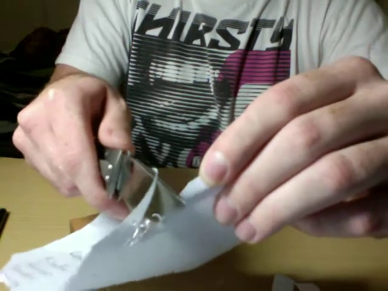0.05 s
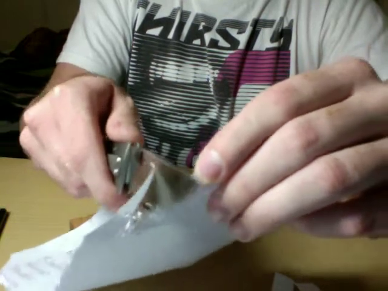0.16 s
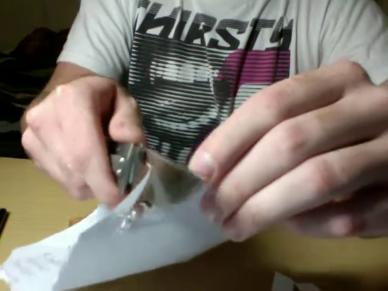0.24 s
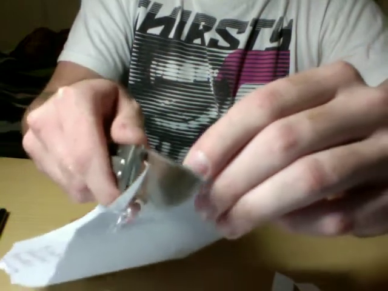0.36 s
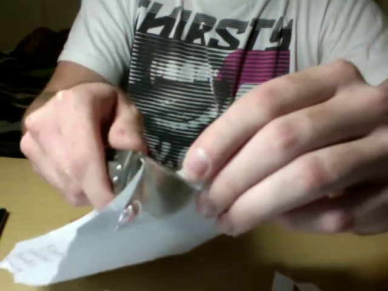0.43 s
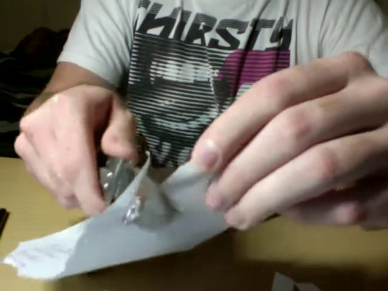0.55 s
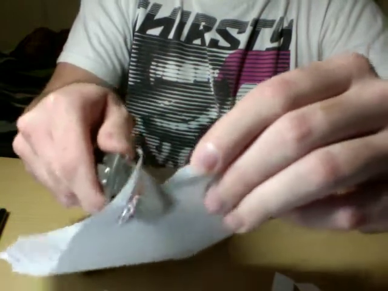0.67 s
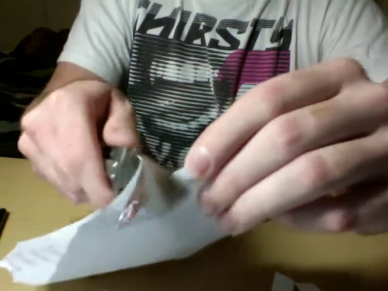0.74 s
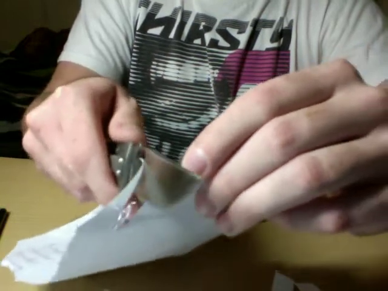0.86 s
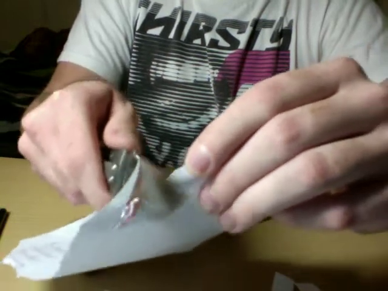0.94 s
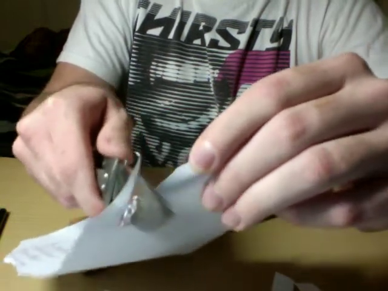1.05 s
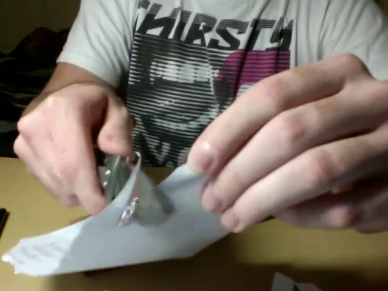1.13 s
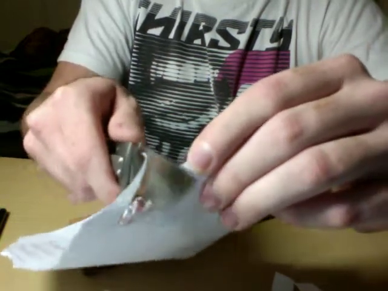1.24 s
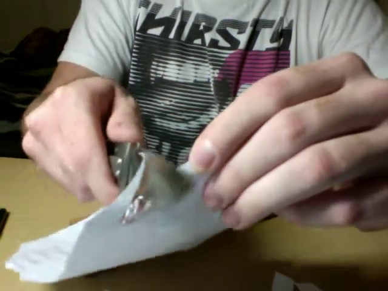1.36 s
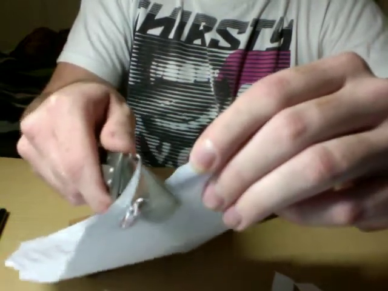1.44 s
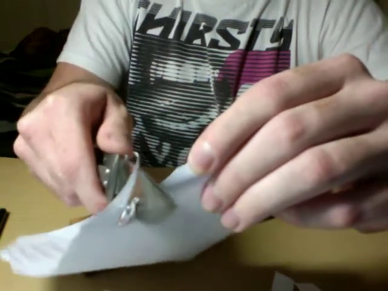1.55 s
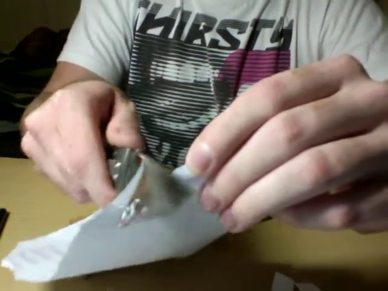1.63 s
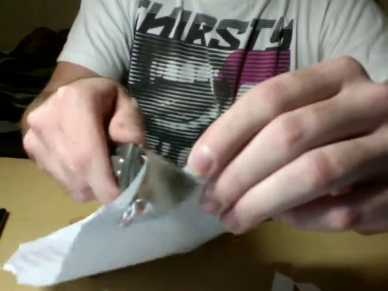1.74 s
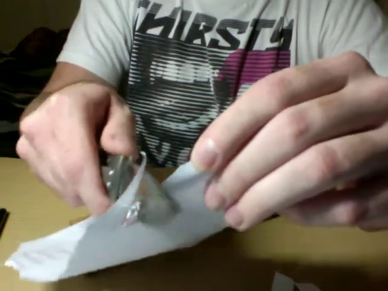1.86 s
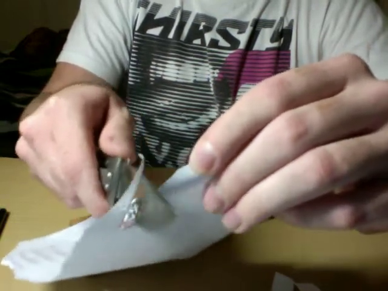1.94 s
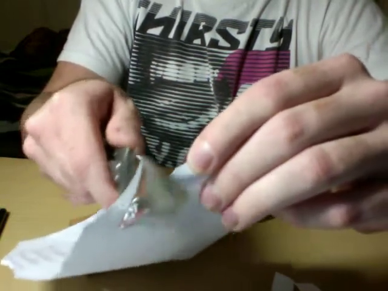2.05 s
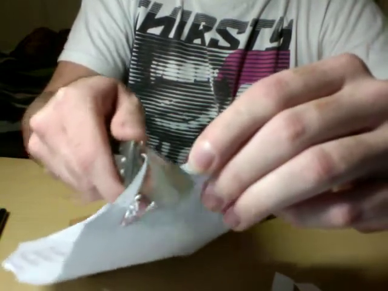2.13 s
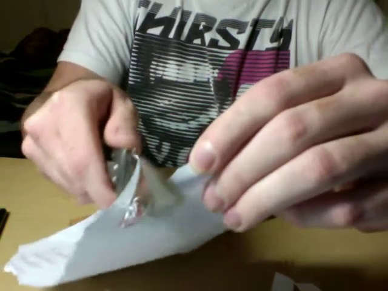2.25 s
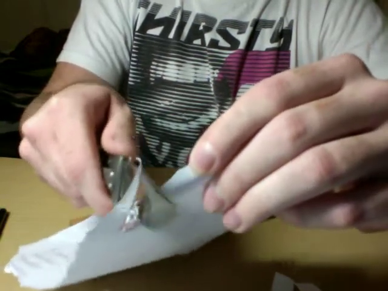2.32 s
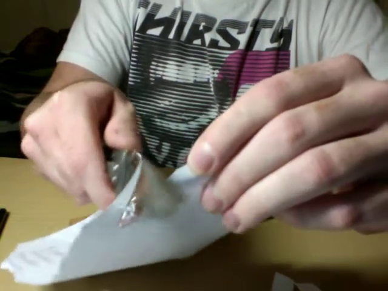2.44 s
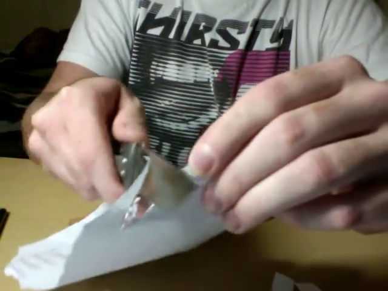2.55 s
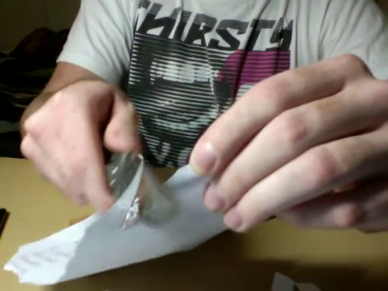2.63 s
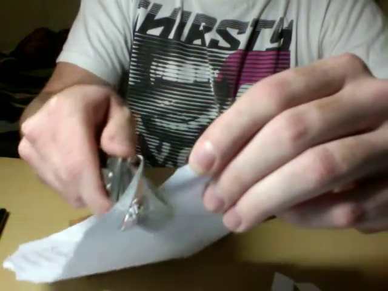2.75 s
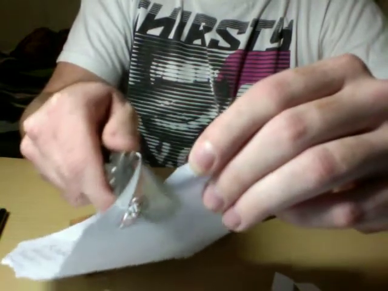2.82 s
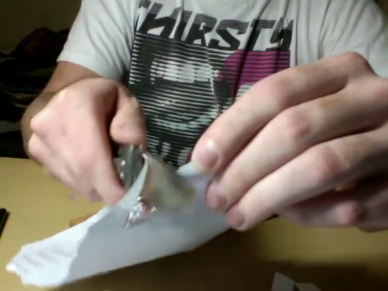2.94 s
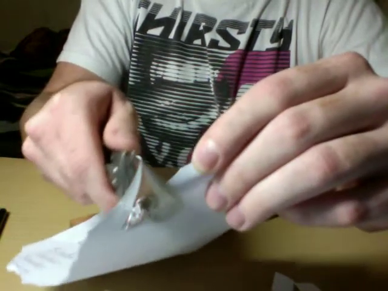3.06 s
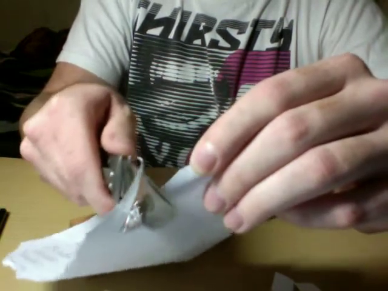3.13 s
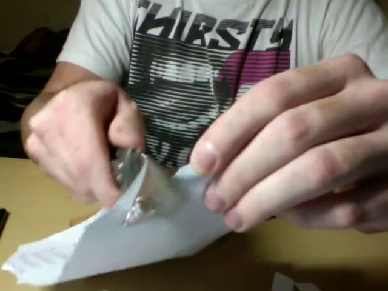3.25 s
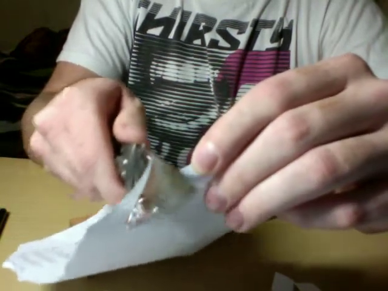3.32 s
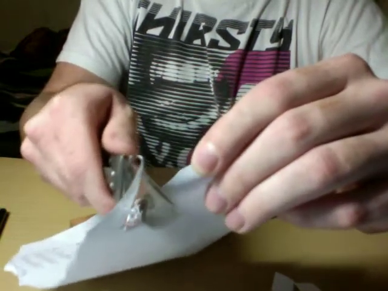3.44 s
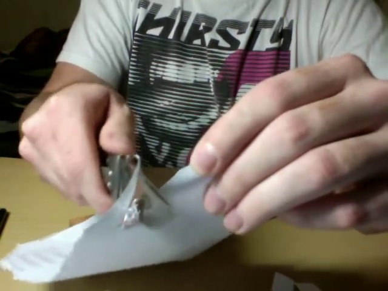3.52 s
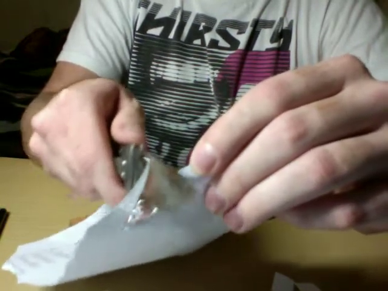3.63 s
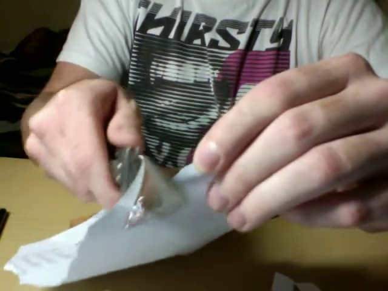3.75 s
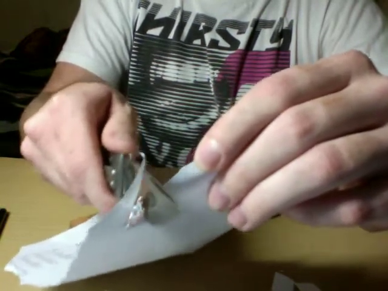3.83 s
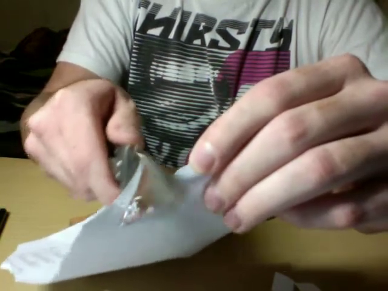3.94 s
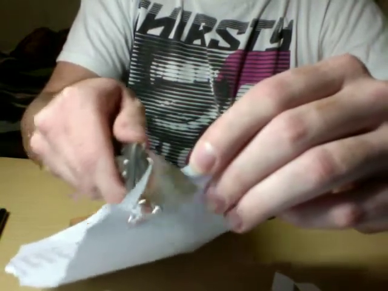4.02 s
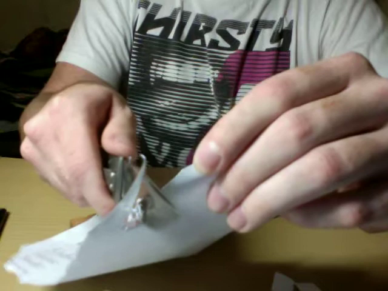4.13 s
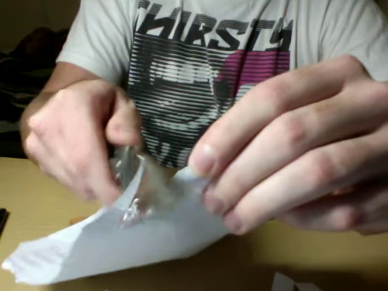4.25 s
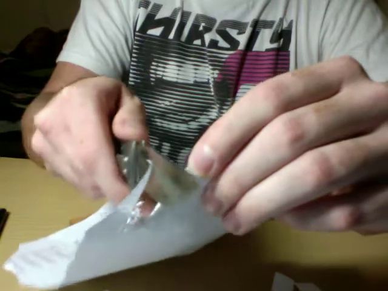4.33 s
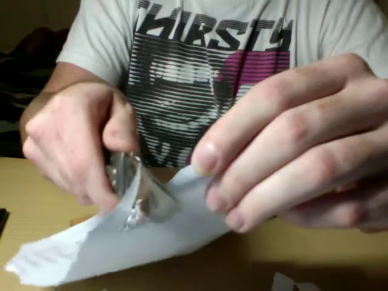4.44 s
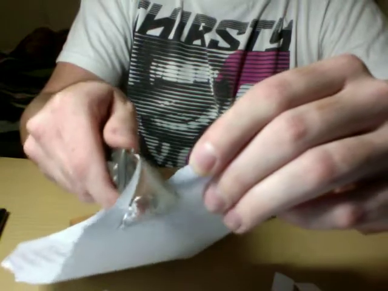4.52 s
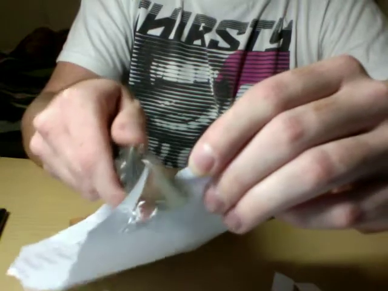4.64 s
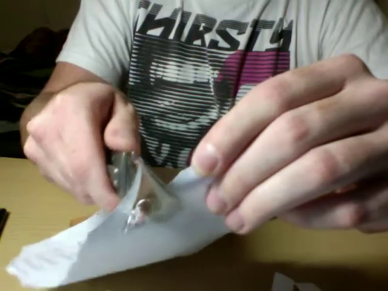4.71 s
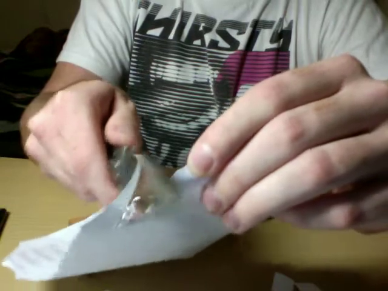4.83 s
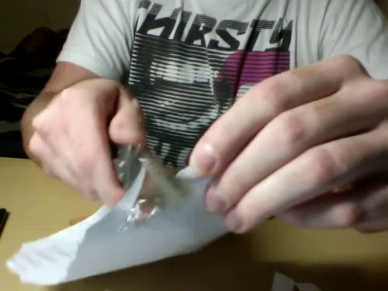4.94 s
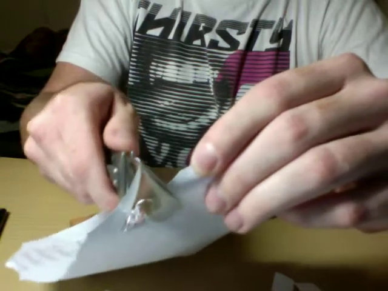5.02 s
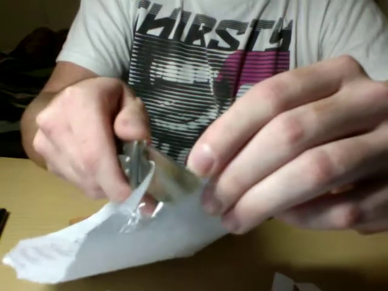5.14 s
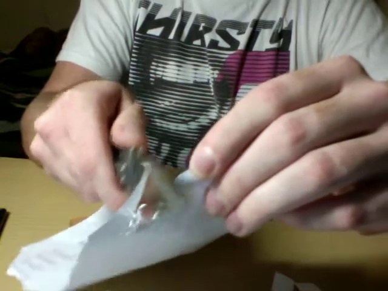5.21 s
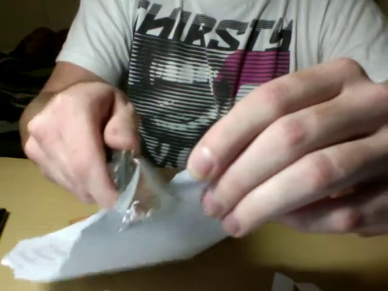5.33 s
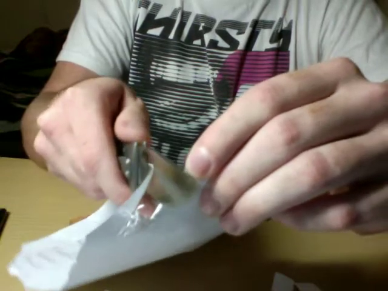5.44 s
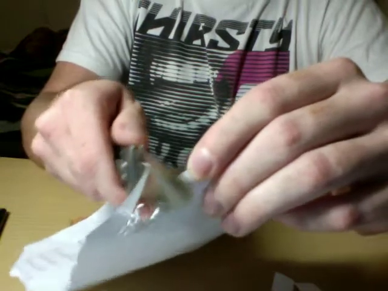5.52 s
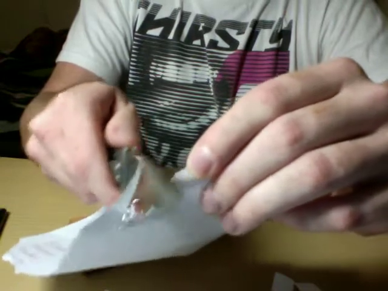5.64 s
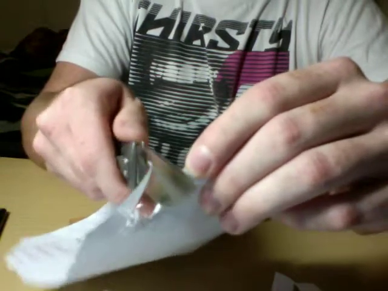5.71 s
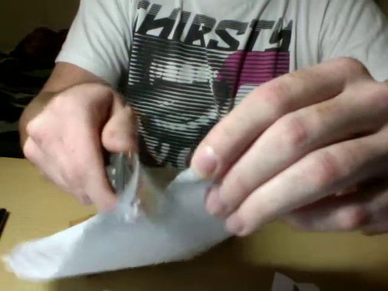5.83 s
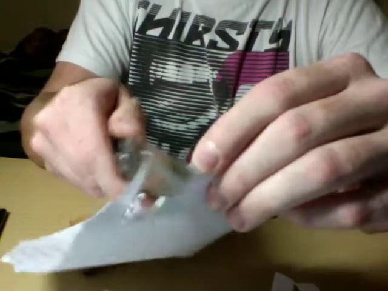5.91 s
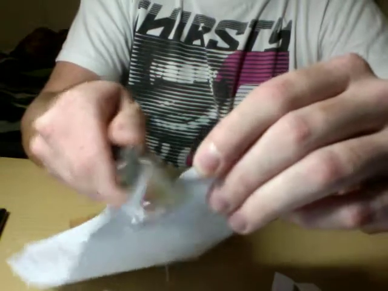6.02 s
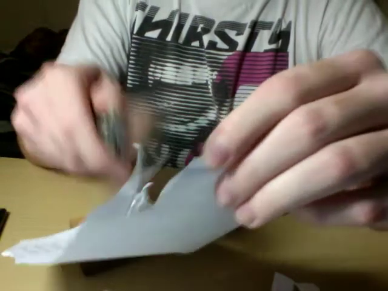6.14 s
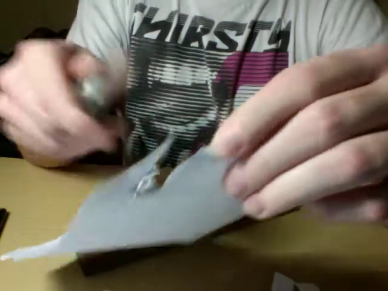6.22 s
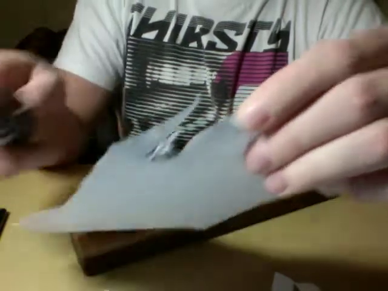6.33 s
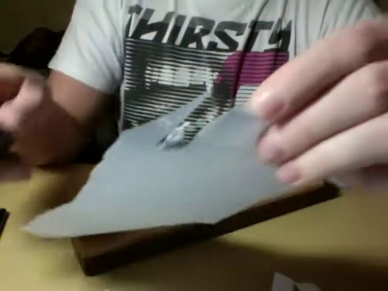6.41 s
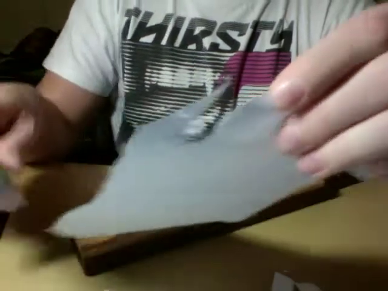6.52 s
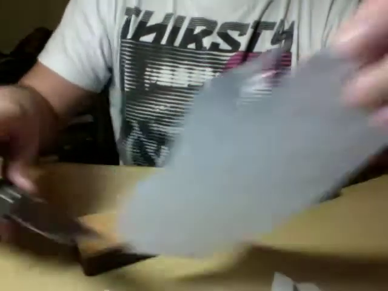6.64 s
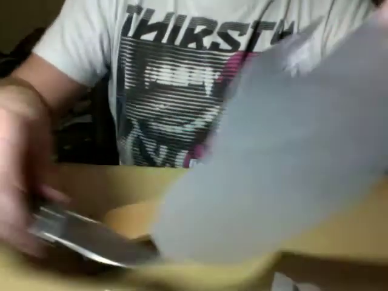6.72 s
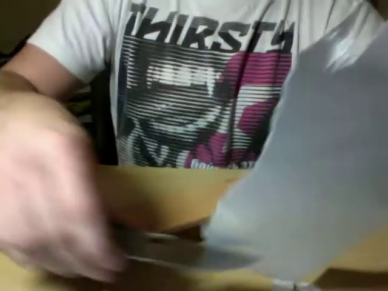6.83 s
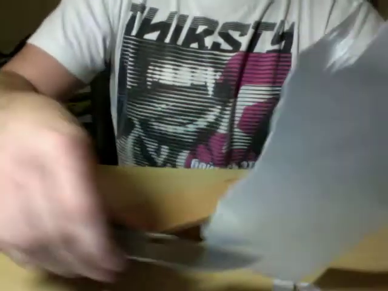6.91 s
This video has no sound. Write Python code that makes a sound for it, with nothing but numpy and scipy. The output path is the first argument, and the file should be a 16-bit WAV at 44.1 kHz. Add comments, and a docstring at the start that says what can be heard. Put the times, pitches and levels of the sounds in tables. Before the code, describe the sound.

Dry, crunchy bursts of snapping paper fibres, each little longer than a tenth of a second, repeat at a quickening pace. Some catch and stutter before breaking free. Between them a thin blade rub whispers in the slit, with tiny ticks and, later, hollow flexing thuds of the sheet. Close microphone, short indoor reflections, soft air hiss; the last second is almost silent.

```python
"""Knife sawing through paper

A hand-held sheet is sawn with a knife, close to the microphone in a small room. Each push is a dense shower
of fibre snaps ringing through the sheet; between pushes the blade rubs softly in the slit, as shaped noise.
As the strokes quicken, decaying tones give dull knocks of the flexing sheet; noise bursts give cracks and ticks.
Short reflections, air hiss and a faint hum lie behind."""
import sys
import numpy as np
from scipy import signal
from scipy.fft import rfft, irfft
from scipy.io import wavfile
from scipy.ndimage import uniform_filter1d

SR = 44100
rng = np.random.default_rng(int(sys.argv[2]) if len(sys.argv) > 2 else 0)


def file_out(sig):
    """Save sig as 16-bit WAV at sys.argv[1]."""
    # one column per channel
    cols = np.atleast_2d(sig).T
    # limit, then scale
    lim = np.clip(cols, -1, 1)
    pcm = np.round(lim * 32767).astype(np.int16)
    wavfile.write(sys.argv[1], SR, pcm)


N = 307363  # length in samples, about 7 s

# Pushes of the blade. Each row: start in seconds, bite-in time in seconds, length in seconds,
# level in dB before the band trims, swell over the push in dB, bass and treble in dB relative
# to the level before their trims, loss of treble over the push in dB.
PUSHES = [(0.408, 0.026, 0.14, -31, -4, -9.5, -21.5, -5.5),
          (0.867, 0.035, 0.13, -31.5, 0.5, -9.5, -19, -3.5), (1.299, 0.047, 0.17, -32, -10, -5.5, -21, 0),
          (1.743, 0.066, 0.11, -33.5, -1.5, -7.5, -16, 9), (2.152, 0.032, 0.145, -32.5, -1, -2, -18, 0),
          (2.555, 0.037, 0.12, -31, -6.5, -4.5, -15.5, 8), (2.976, 0.013, 0.093, -30.5, -3, -10, -20, 2),
          (3.339, 0.063, 0.12, -31, -5, -7.5, -19, 11), (3.69, 0.043, 0.1, -33.5, 5.5, -8.5, -16, 5),
          (4.021, 0.032, 0.11, -37.5, -4.5, -5.5, -15, 11), (4.34, 0.012, 0.084, -31, 6.5, -8, -13.5, 8),
          (4.627, 0.028, 0.09, -29, -1.5, -6.5, -15.5, 9), (4.915, 0.022, 0.094, -32, -11.5, -7, -15, 10.5),
          (5.18, 0.025, 0.084, -30, -3.5, -3.5, -13, 5), (5.444, 0.037, 0.088, -30, 2, 0.5, -10.5, -10),
          (5.702, 0.018, 0.066, -28, 3.5, -5, -13.5, 6), (5.949, 0.015, 0.043, -29, 2, -2.5, -10, 0.5)]
# The edge snags in mid-push, then breaks free. Each row: moment it breaks free in seconds,
# time stuck in seconds, drop in level in dB (negative is a rise).
SNAGS = [(0.43, 0.012, 9), (0.485, 0.051, 10.5), (0.958, 0.037, 13.5), (1.812, 0.018, 16.5),
         (2.257, 0.039, 1), (2.643, 0.035, 19), (3.459, 0.033, 11), (3.728, 0.018, 2.5), (4.105, 0.009, 10),
         (4.687, 0.01, 21), (4.997, 0.012, -3), (5.515, 0.022, 10), (5.544, 0.016, 22), (5.767, 0.0097, 11)]
# Boom of the loose flap beside the slit. Each row: time in seconds, boost of the low bass in dB.
FLAP_BOOST = [(0.4, 4), (1.8, 4.5), (2.65, -9), (3.1, 9), (3.8, 12.5), (4.2, 13), (6.0, 3.5)]
# Colour of the cut sheet. Each row: frequency in Hz, relative density in dB per Hz.
SHEET_COLOUR = [(90, -43.5), (200, -18), (330, -23), (600, -23.5), (1500, -18.5), (3000, -17),
                (5000, -19.5), (6500, -17), (8000, -25), (12000, -28), (15400, -32)]
# Resonances of the sheet. Each row: centre in Hz, width in Hz, lift in dB.
SHEET_MODES = [(405, 118, 22.1), (491.7, 63, 12.8), (633, 160, 17.5), (762.4, 205, 18.1),
               (904.4, 138, 13.5), (1113, 192, 11.4), (1312, 286, 16.8), (1588, 68, 10.8),
               (1748, 154, 12.6), (2038, 130, 8.55), (2278, 432, 13.6), (2526, 276, 4.8), (2866, 203, 9.2),
               (3112, 290, 6.8), (3372, 464, 9.5), (3805, 1020, 8), (3900, 180, 1.8), (4380, 260, 8.8),
               (4850, 370, 8.7), (5417, 73, 9.3), (5720, 1400, 3.84), (7300, 49, 1.8), (7220, 110, 4.2),
               (9130, 2100, 3.4)]
# The blade drawn back through the slit, and last the sheet lifted away. Each row: start in seconds,
# length in seconds, level in dB and treble in dB relative to it (both before trims), ring of the edge in Hz.
RUBS = [(0.053, 0.036, -36.5, -12, 4150), (0.093, 0.072, -52, -4.5, 7800), (0.174, 0.15, -54.5, -3.5, 3300),
        (0.651, 0.05, -57, -7, 3460), (0.7, 0.082, -54, -5, 3300), (1.092, 0.075, -58, -11, 5570),
        (1.165, 0.076, -60, -25, 2840), (1.513, 0.04, -48.5, -10, 3200), (1.575, 0.08, -52, -19, 3430),
        (1.934, 0.12, -57, -11, 2260), (2.369, 0.043, -52, -12, 4440), (2.414, 0.049, -59, -3.5, 5340),
        (2.756, 0.11, -58, -10.5, 2250), (2.947, 0.012, -33, -20, 2370), (3.165, 0.03, -48, -4, 7800),
        (3.187, 0.079, -62, -5, 9500), (3.521, 0.105, -62, -5.5, 2240), (3.868, 0.098, -61, -1, 9400),
        (4.191, 0.1, -59, -1.5, 9500), (4.49, 0.096, -55.5, -8, 5400), (4.782, 0.086, -54.5, -2.5, 6160),
        (5.063, 0.082, -54.5, -5, 10300), (5.327, 0.08, -54, -7.5, 3940), (5.594, 0.081, -56.5, -7.5, 4150),
        (5.862, 0.045, -55.5, -1, 5100), (6.46, 0.16, -82, -2, 14500), (6.653, 0.24, -76, -10, 13000)]
# Colour of paper on the flat of the blade. Each row: frequency in Hz, relative density in dB per Hz.
RUB_COLOUR = [(300, 14), (1000, -4.5), (2000, -3), (3000, -0.5), (4500, -3.5), (6500, -7.5), (8000, -15.5),
              (12000, -20), (15400, -26.5)]
# Resonances of the rubbed paper. Each row: centre in Hz, width in Hz, full lift in dB.
RUB_MODES = [(3340, 400, 7), (4020, 300, 6), (4660, 130, 5), (5420, 450, 10), (6250, 300, 3),
             (6950, 250, 6), (9500, 600, 13), (10500, 700, 6), (13000, 600, 7)]
# The sheet flexes as the blade turns round or breaks free. Each row: start in seconds,
# swing level in dB, pitch in Hz, scuff in dB relative to the swing.
KNOCKS = [(0.586, -44, 308, -34), (1.162, -50, 407, -3), (1.176, -47.5, 366, -6), (2.771, -48, 360, -18),
          (2.848, -36.5, 403, -10), (3.268, -36, 398, -7.5), (3.624, -33.5, 406, -25),
          (3.972, -33, 413, -12), (4.105, -42, 206, 13), (4.297, -32, 414, -15.5), (4.333, -33.5, 434, -23),
          (4.577, -35, 450, -2.5), (4.86, -28.5, 451, -13), (4.996, -40, 456, 10), (5.130, -29, 460, -24),
          (5.449, -34.5, 554, -15), (5.541, -44.5, 430, 20), (5.545, -37, 177, -14),
          (5.653, -27.5, 452, -19), (5.769, -25.5, 417, -24), (5.771, -41, 183, -10),
          (5.912, -31.5, 446, -4.5), (5.953, -23, 630, -16), (6.227, -52, 340, -24),
          (6.249, -38, 316, -10.5), (6.261, -44, 186, -11)]
# The sheet cracks as the edge catches or breaks free. Each row: start in seconds,
# level in dB as if packed into 5 ms, crumple time constant in seconds.
CRACKS = [(0.4856, -48, 0.0092), (.9595, -30, 0.018), (1.8157, -29, 0.0059), (2.6431, -28.5, 0.0019),
          (3.0115, -25, 0.0024), (4.107, -21.5, 0.0034), (4.6975, -32.5, 0.0039), (4.998, -25, 0.0009),
          (5.5459, -24.5, 0.0027), (5.768, -36, 0.0055), (6.012, -32.5, 0.004), (6.028, -31, 0.0015)]
# The cut edge flicks against the steel. Each row: start in seconds,
# level in dB as if packed into 5 ms (before the bass is cut), ring in Hz.
TICKS = [(0.237, -40, 3060), (0.412, -39, 3050), (0.614, -45.5, 5160), (1.598, -44.5, 3800),
         (1.725, -44, 4300), (1.742, -31, 4480), (2.383, -56, 5400), (2.437, -50, 5480), (2.949, -47, 2420),
         (3.18, -41.5, 3200), (5.776, -41, 10800), (5.877, -39.5, 3680), (5.885, -42, 5200),
         (6.122, -44, 13200), (6.124, -42.5, 3920), (6.468, -61, 9500), (6.579, -63, 13500),
         (6.687, -61, 7050), (6.713, -52, 5000), (6.757, -59, 12400)]
# Room air and microphone hiss. Each row: frequency in Hz, relative density in dB per Hz.
AIR_COLOUR = [(60, -7), (100, -15.5), (150, -1.5), (220, -2.5), (400, -5.5), (700, -4.5), (1500, -6),
              (3500, -10.5), (4500, -17), (5200, -18.5), (7200, -24.5), (8200, -28.5), (15500, -48)]
# Faint hum in the room. Each row: frequency in Hz, average level in dB rms.
HUM = [(141, -75), (166, -81), (339, -77), (404, -73)]

BITE_IN_DB = 22  # climb in level while the edge sinks in
RELEASE_DB_PER_S = 913  # fall once the hand stops
BREAK_FREE_S = 0.0084
RUB_RISE_S, RUB_FALL_S = 0.016, 0.032
ROOM_T60_S, WALL_CUT_HZ, ROOM_DB = 0.22, 2100, -14.5  # T60 below the cut
AIR_DB = -59.5  # rms
CUTOFF_HZ = 15750


def cutting(bass_db=-3.9, middle_db=-9.5, rasp_db=-3.0, keen_db=-7.0, treble_db=1.6, clump_db=3.2,
            middle_swell_db=8.0, snag_thinning=0.18, snag_hiss=0.41, keen_follows=0.74,
            usual_treble_db=-9.5, wander_db=3.0, bass_swell_db=-4.5):
    """Fibres part in clumps and ring the sheet; five bands shift in balance along a push and at snags."""
    gain, along, bass, treble = pushes()
    held = snagging()
    fibres = snaps(per_s=9000, spread_db=2.5) * from_db(clump_db * drift(123))
    ringing = through(fibres, response(SHEET_COLOUR, SHEET_MODES))
    sheet = bending(ringing, share=.8)
    sheet = evened(sheet, over_s=0.011)  # the hand keeps an even pressure

    flap = band(sheet, 380, "low")
    low = band(sheet, 870, "low")
    lower_half = band(sheet, 2014, "low")
    upper = band(sheet, 4880, "high")
    high = band(sheet, 7000, "high")

    flap_db = np.interp(np.arange(N) / SR, *np.transpose(FLAP_BOOST))
    booming = low + (from_db(flap_db) - 1) * flap
    body_db = bass + bass_db + bass_swell_db * along - snag_thinning * held
    body = from_db(body_db) * rms_one(booming)
    crunch_db = middle_db + middle_swell_db * along - snag_thinning * held
    crunch = from_db(crunch_db) * rms_one(lower_half - low)
    rasp = from_db(rasp_db) * rms_one(sheet - lower_half - upper)
    # the keen top of the rasp follows the treble and wanders with the angle of the edge
    keen_level_db = keen_db + keen_follows * (treble - usual_treble_db) + wander_db * drift(33)
    keen = from_db(keen_level_db) * rms_one(upper - high)
    hiss = from_db(treble + treble_db + snag_hiss * held) * rms_one(high)
    return gain * from_db(-held) * (body + crunch + rasp + keen + hiss)


def pushes():
    """Each push bites in, holds and lets go: gain, place along it (-.5 to .5), bass dB and treble dB."""
    t = np.arange(N) / SR
    gain, along, bass, treble = np.zeros((4, N))
    for s, bite_s, length_s, db, swell_db, bass_db, treble_db, dulling_db in PUSHES:
        now = (t > s - bite_s / 2) & (t < s + length_s + .1)
        age = t[now] - s
        along[now] = np.clip(age / length_s, 0, 1) - .5
        attack = BITE_IN_DB * np.maximum(1 - age / bite_s, 0) ** 2
        release = RELEASE_DB_PER_S * np.maximum(age - length_s, 0)
        gain[now] += from_db(db + swell_db * along[now] - attack - release)
        bass[now] = bass_db
        treble[now] = treble_db - dulling_db * along[now]
    return gain, along, bass, treble


def snagging():
    """How far the cut is held back, in dB: the edge slows, sticks, and is suddenly free."""
    t = np.arange(N) / SR
    held = np.zeros(N)
    for s, stuck_s, db in SNAGS:
        corners = [s - stuck_s, s - stuck_s / 2, s - BREAK_FREE_S / 2, s + BREAK_FREE_S / 2]
        held += np.interp(t, corners, [0, db, db, 0])
    return held


def rubbing(level_db=0.56, treble_db=-1.5, flutter_db=2.0, ring_width_hz=500, ring_db=9, mode_spread=0.54):
    """The flat of the blade slides on the paper: a thin swish; each contact rings at a pitch of its own."""
    t = np.arange(N) / SR
    friction = snaps(per_s=6400, spread_db=3.0) * from_db(flutter_db * drift(42))
    sliding = bending(friction, share=1.8, farthest_s=.0025)
    out = np.zeros(N)
    for s, length_s, db, bright_db, hz in RUBS:
        now = np.abs(t - s - length_s / 2) < length_s / 2 + RUB_RISE_S + RUB_FALL_S
        # each contact damps other resonances
        touched = 1 - mode_spread * rng.random(len(RUB_MODES))
        modes = [(centre, width, lift * share) for (centre, width, lift), share in zip(RUB_MODES, touched)]
        edge = response(RUB_COLOUR, modes + [(hz, ring_width_hz, ring_db)])
        swish = signal.fftconvolve(sliding[now], edge)[:now.sum()]
        swish = band(swish, 600, "high")
        high = band(swish, 7000, "high")
        rise = (t[now] - s) / RUB_RISE_S
        fall = (s + length_s - t[now]) / RUB_FALL_S
        contact = np.clip(np.minimum(rise, fall) + .5, 0, 1) ** 2
        balanced = rms_one(swish - high) + from_db(bright_db + treble_db) * rms_one(high)
        out[now] += from_db(db + level_db) * contact * balanced
    return out


def knocks(swell_s=0.0038, overtone=1.523, overtone_db=-11, scuff_cut_hz=2000,
           after_hz=408, after_db=-19, after_t60=0.14):
    """The sheet bends over and swings for a few cycles with a dull scuff; one mode rings on faintly."""
    out, t = np.zeros(N), np.arange(SR // 6) / SR
    swing = (t / swell_s) ** 2 * np.exp(2 - 2 * t / swell_s)
    after_decay = from_db(after_db - 60 * t / after_t60) * (1 - np.exp(-t / swell_s))
    after = after_decay * np.sin(2 * np.pi * after_hz * t)
    rough = through(snaps(per_s=2200, spread_db=-2.0), response(SHEET_COLOUR, SHEET_MODES))
    scuff = rms_one(band(rough, scuff_cut_hz, "low"))
    for s, db, hz, scuff_db in KNOCKS:
        modes = np.sin(2 * np.pi * hz * t)
        modes += from_db(overtone_db) * np.sin(2 * np.pi * overtone * hz * t)
        grit = from_db(scuff_db) * scuff[int(s * SR):][:len(t)]
        add(out, s, from_db(db) * (swing * (modes + grit) + after))
    return out


def cracks(dull_hz=5000):
    """The taut sheet lets go all at once; a wide patch moves, so it is duller than a single fibre."""
    out = np.zeros(N)
    pole = np.exp(-2 * np.pi * dull_hz / SR)
    sheet = signal.lfilter([1], [1, -pole], response(SHEET_COLOUR, SHEET_MODES))
    for s, db, crumple_s in CRACKS:
        add(out, s, from_db(db) * flick(sheet, crumple_db=-16, crumple_s=crumple_s))
    return out


def ticks(ring_width_hz=700, ring_db=14):
    """A small stiff corner of paper flicks and rings at its own pitch; it is too small to give bass."""
    out = np.zeros(N)
    for s, db, hz in TICKS:
        corner = response(RUB_COLOUR, RUB_MODES + [(hz, ring_width_hz, ring_db)])
        add(out, s, from_db(db) * flick(corner, crumple_db=5, crumple_s=0.006))
    return band(out, 1200, "high")


def flick(impulse, crumple_db, crumple_s):
    """A sharp click and a short crumpling, rung through the paper; rms 1 if packed into 5 ms."""
    t = np.arange(len(impulse)) / SR
    force = from_db(crumple_db) * np.exp(-t / crumple_s) * rng.standard_normal(len(t))
    force[0] = 1
    sound = signal.fftconvolve(force, impulse)
    return sound / np.sqrt(np.sum(sound ** 2) / (.005 * SR))


def snaps(per_s, spread_db):
    """Tiny clicks of either sign at random moments, their sizes spread exponentially in dB; rms 1."""
    sizes = from_db(spread_db * np.minimum(rng.exponential(1, N), 4)) * rng.choice([-1, 1], N)
    return rms_one(sizes * (rng.random(N) < per_s / SR))


def bending(x, share, rate=12, nearest_s=.0003, farthest_s=.0045, count=12):
    """Waves return from the sheet's edges; as it bends each echo swells and fades, shifting resonances."""
    out = x.copy()
    for lag in (rng.uniform(nearest_s, farthest_s, count) * SR).astype(int) + 1:
        out[lag:] += share / np.sqrt(count) * (drift(rate) * x)[:-lag]
    return rms_one(out)


def room(x, first_echo_s=0.0055, treble_life=0.68):
    """Dense reflections from the desk and walls die away quickly, the treble sooner."""
    t = np.arange(SR // 2) / SR
    echoes = rng.standard_normal(len(t)) * (t > first_echo_s)
    dull = band(echoes, WALL_CUT_HZ, "low")
    dull_tail = dull * from_db(-60 * t / ROOM_T60_S)
    bright_tail = (echoes - dull) * from_db(-60 * t / (treble_life * ROOM_T60_S))
    tail = dull_tail + bright_tail
    return through(x, tail / np.linalg.norm(tail))


def background(waver_db=0.5):
    """Steady air, as coloured noise, with a faint hum of slowly wavering sines."""
    t = np.arange(N) / SR
    hum = np.zeros(N)
    for hz, db in HUM:
        level = from_db(db + waver_db * drift(0.5)) * np.sqrt(2)  # rms to peak
        hum += level * np.sin(2 * np.pi * hz * t)
    return hum + from_db(AIR_DB) * through(rng.standard_normal(N), response(AIR_COLOUR))


def from_db(db):
    """Decibels to gain."""
    return 10 ** (np.asarray(db) / 20)


def rms_one(x):
    """Scale to an rms of 1."""
    return x / np.sqrt(np.mean(x ** 2) + 1e-20)


def drift(rate):
    """Smooth random wander: noise through two equal low-pass poles at `rate` Hz; rms 1."""
    r = np.exp(-2 * np.pi * rate / SR)
    wander = signal.lfilter([1], [1, -2 * r, r * r], rng.standard_normal(N + SR))
    return rms_one(wander[SR:])  # skip the filter's first second


def band(x, hz, kind):
    """Low-pass or high-pass without delay, so that bands add up again."""
    return signal.sosfiltfilt(signal.butter(2, hz, kind, fs=SR, output="sos"), x)


def response(spectrum, modes=(), size=4096):
    """Causal (minimum-phase) impulse response of a smooth colour with resonances on it; energy 1."""
    hz = np.arange(size // 2 + 1) * SR / size + 1
    points = np.array(spectrum)
    db = np.interp(np.log(hz), np.log(points[:, 0]), points[:, 1])
    db -= 12 * np.log2(np.maximum(points[0, 0] / hz, 1))  # 12 dB per octave below the first point
    for centre, width, lift in modes:
        db += lift / (1 + (2 * (hz - centre) / width) ** 2)
    # folding the cepstrum onto positive time gives minimum phase
    cepstrum = irfft(np.log(from_db(db)))
    cepstrum[1:size // 2] *= 2
    cepstrum[size // 2 + 1:] = 0
    impulse = irfft(np.exp(rfft(cepstrum)))
    return impulse / np.linalg.norm(impulse)


def through(x, impulse):
    """Play a signal through an impulse response."""
    return signal.fftconvolve(x, impulse)[:N]


def evened(x, over_s):
    """Hold the loudness steady over a short stretch, leaving the fine grain."""
    power = uniform_filter1d(x ** 2, max(int(over_s * SR), 1))
    return x / np.sqrt(np.maximum(power, 1e-9))


def add(out, s, sound):
    """Mix a sound in at time s."""
    start = int(s * SR)
    out[start:start + len(sound)] += sound[:N - start]


def scene():
    """Knife and paper close by, their room, and the background."""
    paper = cutting() + rubbing() + knocks() + cracks() + ticks()
    mix = paper + from_db(ROOM_DB) * room(paper) + background()
    return mix[None, :]


def record(dry):
    """The microphone sheds the deep bass; the top is cut steeply."""
    thin = signal.sosfilt(signal.butter(3, 112, "high", fs=SR, output="sos"), dry)
    return signal.sosfilt(signal.ellip(10, .2, 70, CUTOFF_HZ, fs=SR, output="sos"), thin)


dry = scene()
out = record(dry)
file_out(out)
```